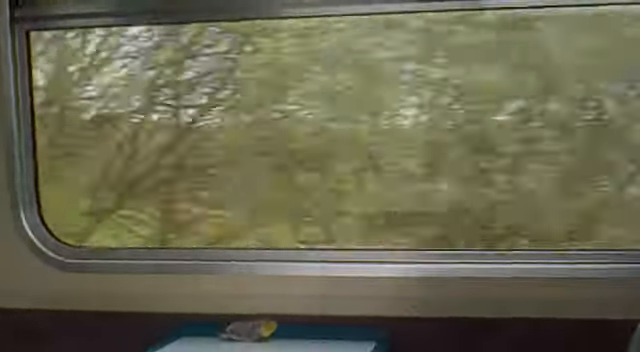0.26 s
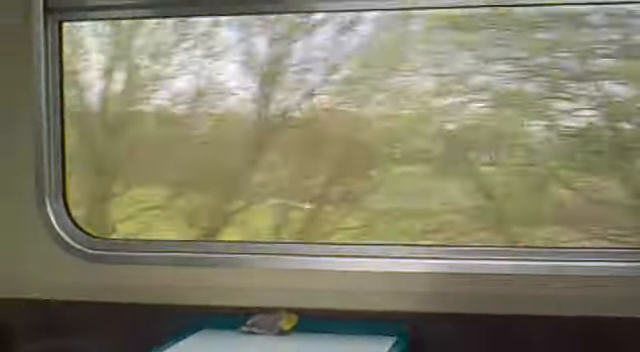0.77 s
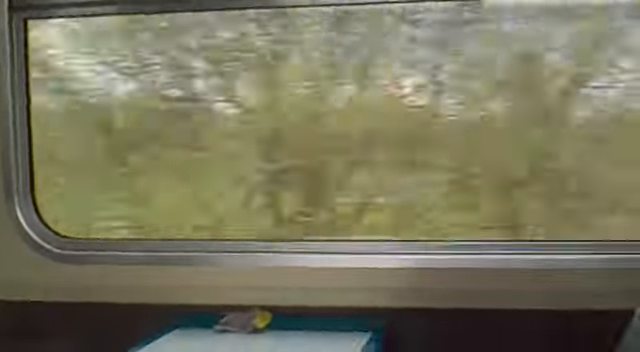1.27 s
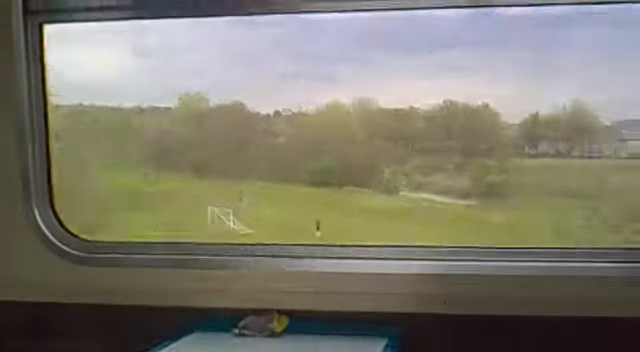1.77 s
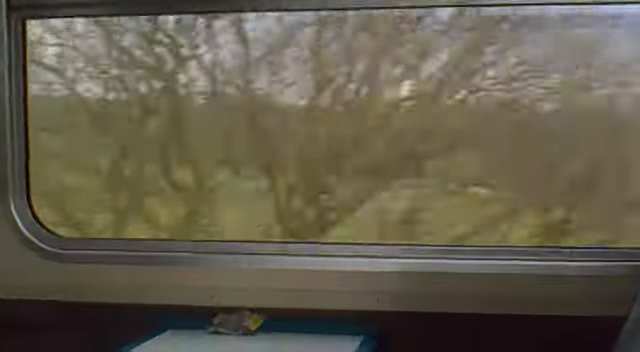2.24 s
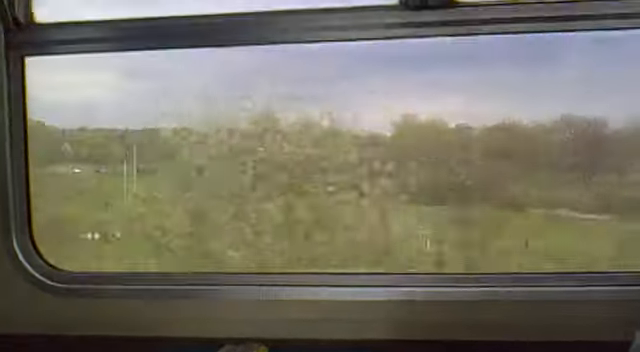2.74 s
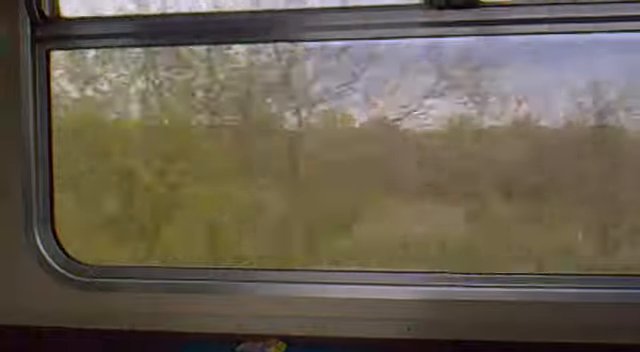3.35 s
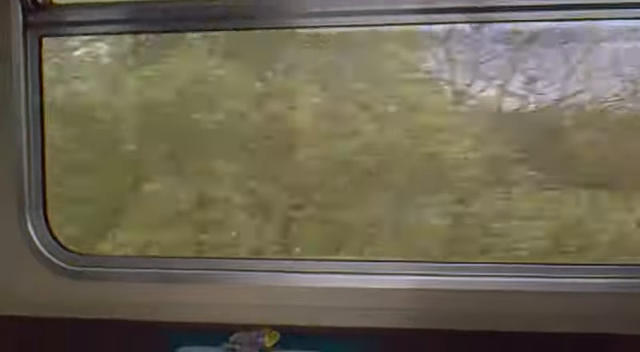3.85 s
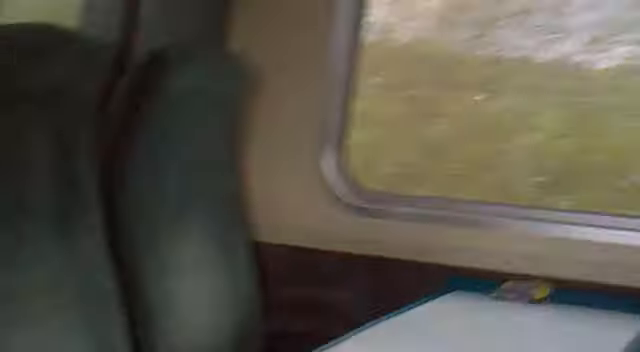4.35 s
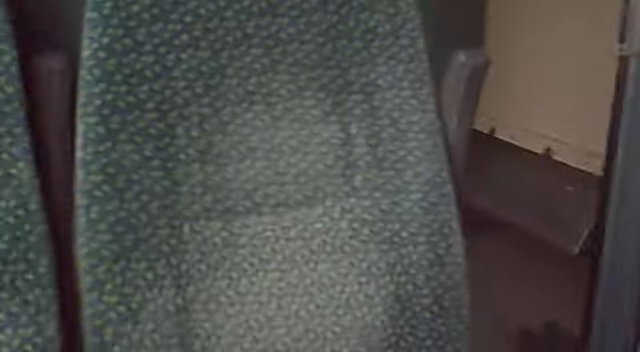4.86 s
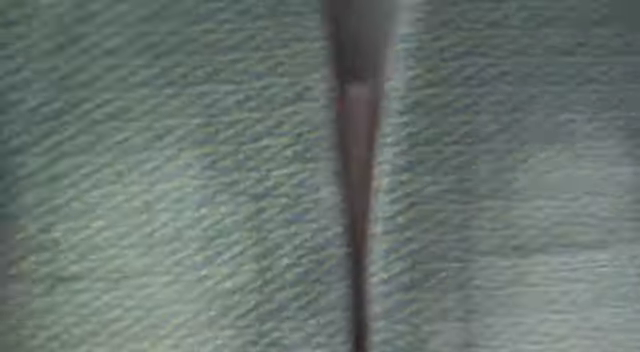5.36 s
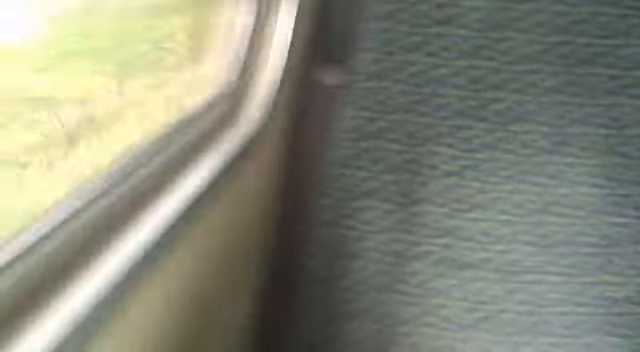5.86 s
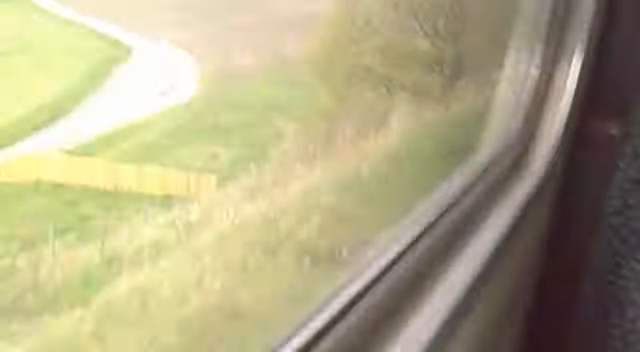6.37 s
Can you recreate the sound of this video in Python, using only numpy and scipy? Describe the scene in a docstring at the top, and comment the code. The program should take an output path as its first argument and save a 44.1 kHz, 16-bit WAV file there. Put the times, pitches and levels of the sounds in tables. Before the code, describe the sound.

Clusters of dull metallic wheel knocks recur under a rumbling, droning train carriage, and a hard loud click snaps nearby past the middle.

```python
"""Diesel train on jointed track

Inside a carriage, about every 0.85 s a group of axles crosses a rail joint. Each wheel blow is built from
ringing floor, frame and wheel, noise bursts for clatter and loose fittings, and a slow low shudder.
Steady shaped noise makes the body rumble, the drive drone and the wheels roar and hiss on the rail.
A few dry clicks close by are pairs of tiny contacts heard through a small ringing part."""
import sys
import numpy as np
from scipy import signal
from scipy.fft import rfft, irfft, next_fast_len
from scipy.io import wavfile
from scipy.ndimage import map_coordinates

SR = 44100
rng = np.random.default_rng(int(sys.argv[2]) if len(sys.argv) > 2 else 0)


def put_to_file(sound):
    """Save the sound as 16-bit audio at rate SR, in the file named by the first command-line argument."""
    columns = np.atleast_2d(sound).T  # one column per channel
    safe = np.clip(columns, -1, 1)
    whole_steps = np.round(safe * 32767)
    wavfile.write(sys.argv[1], SR, whole_steps.astype(np.int16))


N = 291942

# Spectra give only the balance between pitches; noise() then evens out the loudness.
# low rumble and shudder of the carriage body: f/Hz, relative level/dB
RUMBLE_SPECTRUM = [(8, -5), (20, -3.5), (32, 3), (45, -7), (62, -6.5), (90, -18), (130, -15.5),
                   (250, -32.5), (600, -66.5)]
# roar of wheels rolling on rail: f/Hz, relative level/dB
ROAR_SPECTRUM = [(60, -14), (110, 7.5), (180, 6), (260, 3.5), (550, 1), (800, 3), (1250, -6), (1450, -11),
                 (2200, -16), (4000, -53)]
# hiss of wheels on rail: f/Hz, relative level/dB
HISS_SPECTRUM = [(900, -6), (1600, 7), (2300, 4), (3100, -2.5), (4300, -10), (6300, -15.5), (8300, -27),
                 (12000, -31), (14500, -36), (16000, -30)]
# resonances of the drive in the cabin, before drive_drone() sharpens them: f/Hz, width/Hz, level/dB
DRONE_MODES = [(142, 15, -7), (376, 25.6, 2), (406.7, 31, -1.5), (426.4, 21, -3.5)]
# state of the rail: t/s, roar level/dB, hiss level/dB
RAIL_STATE = [(0.0, -48, -50), (0.35, -49, -56.5), (1.2, -51.5, -56.5), (2.9, -50.5, -55), (3.75, -45, -50),
              (4.55, -47.5, -56), (5.4, -47, -58), (6.6, -41.5, -54)]
# effort of the drive: t/s, drone level/dB
DRIVE_EFFORT = [(0.1, -46.5), (0.37, -58), (0.55, -37), (1.25, -52.5), (2.2, -47), (2.75, -43.5),
                (4.1, -42), (5.5, -47), (6.6, -43)]
# wheels on joints, mostly three axles to a joint:
# t/s, strength/dB, weight on the floor/dB, frame thud relative to strength/dB, rise/s
BLOWS = [ (0.001, -42.5, 2.5, -1, 0.0012), (0.5348, -32, -2.5, -9, 0.00052),
         (0.639, -30.5, 2.5, -1, 0.0063), (0.7587, -24, 8, 0, 0.0021), (1.388, -35, 0.5, -11, 0.0044),
         (1.499, -35.5, 5, -3, 0.0045), (1.617, -29, 11.5, -8, 0.00079), (1.785, -45.5, -7.5, -7.5, 0.0034),
         (1.915, -49.5, 2, -12, 0.0036), (2.247, -39, 1.5, -4, 0.0086), (2.334, -28.5, -1, -7, 0.0013),
         (2.4506, -22.5, 5.5, -9.5, 0.0013), (3.087, -34.5, -7, -7, 0.0021), (3.212, -37, 0.5, -10, 0.0027),
         (3.344, -47.5, 8.5, -5, 0.007), (3.474, -45, -1, -10, 0.0056), (4.068, -30, 2, -1.5, 0.0041),
         (4.193, -27, 6.5, 1.5, 0.0017), (4.829, -33, -4.5, -9, 0.0035), (4.94, -29.5, 0, -0.5, 0.0062),
         (5.06, -25, 2.5, -2, 0.0043), (5.711, -39.5, 2, 1.5, 0.0044), (5.824, -43.5, 4.5, 3.5, 0.013),
         (5.9445, -36.5, 5, 2, 0.00033), (6.326, -56, 9.5, 11, 0.00067), (6.428, -58.5, 11, 20.5, .006)]
# floor panels and underframe: f/Hz, width/Hz, level/dB
FLOOR_MODES = [(218, 18, -15.5), (262.7, 17, 1), (302, 72, -7), (363, 13, -4), (397, 27, -12.5),
               (459.4, 6.6, 1), (703, 62, -2)]
# frame: f/Hz, width/Hz, level/dB
FRAME_MODES = [(148.5, 7.9, 0), (187.3, 5.6, -5)]
# wheel and bogie steel, as peaks on the clatter: f/Hz, width/Hz, lift/dB
STEEL_PEAKS = [(678, 65, 4.5), (738, 14, 5.5), (1280, 35, 1.5), (1876, 74, -4), (2040, 41, 1.5),
               (2320, 24, 2), (2400, 83, -4), (2840, 40, 5.5)]
# clatter through the steel body: f/Hz, relative level/dB
CLATTER_SPECTRUM = [(150, -40), (400, 8.5), (650, 3), (1000, 1.5), (1600, 2), (2500, 1.5), (3200, -12.5),
                    (4500, -20), (8000, -56)]
# sizzle of fittings: f/Hz, relative level/dB
SIZZLE_SPECTRUM = [(1800, -31), (3200, 2), (4000, -1.5), (5500, -4.5), (6700, -10), (7500, -17),
                   (8500, -20), (10500, -23.5), (12000, -28), (15500, -44)]
# diffuse boom of the floor panels: f/Hz, relative level/dB
BOOM_SPECTRUM = [(90, -25), (180, -3.5), (250, -5.5), (400, -3), (550, -10), (900, -0.5), (2000, -76)]
# ring of a struck wheel: f/Hz, relative level/dB, time to fall by 60 dB/s
CLANG_PARTIALS = [(2205, -2, 0.47), (2260, 3.5, 0.21), (2400, 0, 0.24), (2850, -6, 0.22)]
# small hard clicks nearby: t/s, peak level/dB, treble tilt above 2 kHz/(dB per octave)
CLICKS = [(3.887, -32, -6), (3.909, -23.5, -2), (4.081, -4, -3), (4.1507, -14, -0.5), (4.356, -19.5, -10),
          (4.762, -40.5, -2)]
# what the clicking part rings with: f/Hz, width/Hz, level/dB
TICK_MODES = [(2430, 1000, 7.5), (3730, 2100, 1), (6960, 870, -17.5), (14200, 3500, -7)]

# upper edge of the sound
TOP_HZ = 15850
# steady rumble, how far it sways, and how far the rail noises wander
RUMBLE_DB, SWAY_DB, PATCHY_DB = -42.5, 3, 1.5
# an ordinary blow: strength, rise and ring time (a fall of 60 dB)
USUAL_DB, USUAL_RISE_S, RING_T60_S = -31.5, 0.0017, 0.35
# abrupt blows die sooner and ring the wheel more; so many dB of extra strength halve the ring time
RING_PER_RISE, CLANG_DB_PER_HALVING, RING_HALVING_DB = 0.26, 0.5, 15.5
# treble limit of the knock, and the dB of weight that lower it an octave
CONTACT_HZ, CONTACT_HALVING_DB = 793, 10
# springs even out the blows: shudder of an ordinary one, and dB more per dB of strength or weight
SHUDDER_DB, SHUDDER_PER_DB = -30.5, 0.36
# what a blow excites, relative to its strength, before weight and abruptness change it
CLATTER_DB, KNOCK_DB, SIZZLE_DB, CLANG_DB = -0.24, -1.6, -13.5, -11.5
# a light wheel rings more freely: dB of clang lost per dB of weight
CLANG_DAMPING = 0.38
# diffuse boom against the clean ring of the panels
BOOM_DB = -0.5
# the wheel lands again after its hop: usual delay and its random scatter
REBOUND_S, REBOUND_SCATTER_S = 0.0185, 0.0012


def amp(db):
    """Turn decibels into a gain."""
    return 10 ** (np.asarray(db) / 20)


def unit(x):
    """Scale x to an average (rms) level of 1."""
    return x / np.sqrt(np.mean(x ** 2) + 1e-20)


def onset_unit(x):
    """Scale x so that its first 40 ms spread (standard deviation) by 1."""
    return x / np.std(x[:SR // 25])


def along(points, hz):
    """Read a (frequency, value) table between its points, on a log frequency axis."""
    f, v = np.transpose(points)
    return np.interp(np.log(hz + 1), np.log(f + 1), v)


def curves(rows):
    """Draw one value per sample for each column after the time."""
    s, *columns = np.transpose(rows)
    return [np.interp(np.arange(N) / SR, s, column) for column in columns]


def wobble(rate):
    """Make a smooth random curve through `rate` random points a second."""
    knots = rng.standard_normal(int(N * rate / SR) + 4)
    return map_coordinates(knots, [np.arange(N) * rate / SR])


def filtered(x, response):
    """Pass x through a response given as a function of frequency."""
    m = next_fast_len(len(x) + SR // 2)  # room for the ringing after the end
    spectrum = rfft(x, m) * response(np.fft.rfftfreq(m, 1 / SR))
    return irfft(spectrum, m)[:len(x)]


def lowpassed(x, hz):
    """Gently take away what lies above hz."""
    return signal.sosfilt(signal.butter(2, min(hz, SR / 4), fs=SR, output="sos"), x)


def resonances(modes, f):
    """Add up the responses of damped parts that ring only after they are pushed."""
    return sum(amp(db) * 1j * f * width / (center * center - f * f + 1j * f * width)
               for center, width, db in modes)


def noise(spectrum, size, peaks=()):
    """Make noise of rms 1 with a broad spectrum and narrow peaks on top."""
    def response(f):
        lift_db = sum(db / (1 + (2 * (f - center) / width) ** 2) for center, width, db in peaks)
        return amp(along(spectrum, f) + lift_db)
    return unit(filtered(rng.standard_normal(size), response))


def add(track, s, sound):
    """Mix a sound into the track at time s."""
    start = max(round(s * SR), 0)
    track[start:start + len(sound)] += sound[:N - start]


def body_rumble():
    """The carriage body rumbles: low noise whose level slowly sways."""
    return amp(RUMBLE_DB + SWAY_DB * wobble(7)) * noise(RUMBLE_SPECTRUM, N)


def drive_drone():
    """The drive drones: noise through cabin resonances, louder and softer with its effort."""
    drone_db, = curves(DRIVE_EFFORT)
    # a power above 1 makes the resonances stand out more
    response = lambda f: np.abs(resonances(DRONE_MODES, f)) ** 1.56
    return amp(drone_db) * unit(filtered(rng.standard_normal(N), response))


def rail_noise():
    """Wheels roar and hiss on the rail: two noises rise and fall together over rough and smooth patches."""
    roar_db, hiss_db = curves(RAIL_STATE)
    patches_db = PATCHY_DB * wobble(12)
    roar = amp(roar_db + patches_db) * noise(ROAR_SPECTRUM, N, [(824, 53, 4.1), (1260, 134, 6.9)])
    hiss = amp(hiss_db + patches_db) * noise(HISS_SPECTRUM, N)
    return roar + hiss


def blow(t, rise, hold, t60, tail_db, tail_t60):
    """Vibration spreads, lasts while the wheel chatters, dies fast, and lingers faintly in the carriage."""
    late = np.maximum(t - hold, 0)
    growth = 1 - np.exp(-t / max(rise, 1e-4))
    return growth * np.hypot(amp(-60 * late / t60), amp(tail_db - 60 * late / tail_t60))


def struck(modes, t, rebound, delay):
    """The wheel drops on the rail end and rebounds; the modes ring from both short pushes."""
    push = lambda s: np.exp(-((t - s) / 0.00019) ** 2)
    force = push(0.0019) + rebound * push(0.0021 + delay)
    return filtered(force, lambda f: resonances(modes, f))


def floor_knock(t, rise, t60, weight_db, hop):
    """The floor panels ring cleanly from the two pushes and also boom diffusely through the carriage."""
    boom = noise(BOOM_SPECTRUM, SR, [(266, 33, 7.6), (373, 76, 7.1)])
    boom = boom * blow(t, rise * 2, 0.015, t60 * 1.09, -16, 0.99)
    ring = struck(FLOOR_MODES, t, rebound=1.0, delay=hop)
    knock = onset_unit(ring) + amp(BOOM_DB) * onset_unit(boom)
    # a heavy wheel stays longer in contact and weakens the upper panel modes
    return lowpassed(knock, CONTACT_HZ * 2 ** (-weight_db / CONTACT_HALVING_DB))


def wheel_clang(t, rise, scatter_db):
    """A struck wheel rings in fading pure tones, each struck a little differently every time."""
    tones = sum(np.sin(2 * np.pi * hz * t) * amp(db + scatter_db * rng.normal() - 60 * t / t60)
                for hz, db, t60 in CLANG_PARTIALS)
    return tones * (1 - np.exp(-t / rise))


def joints():
    """Each axle at a joint knocks the floor, thuds the frame, clangs, clatters, sizzles and shudders."""
    out, t = np.zeros(N), np.arange(SR) / SR
    for s, strength_db, weight_db, thud_db, rise in BLOWS:
        excess_db = strength_db - USUAL_DB
        softness = np.log2(max(rise, 1e-4) / USUAL_RISE_S)  # octaves slower than usual
        t60 = RING_T60_S * 2 ** (RING_PER_RISE * softness - excess_db / RING_HALVING_DB)
        hop = REBOUND_S + REBOUND_SCATTER_S * rng.normal()

        # loose parts chatter in small uneven bursts
        chatter = amp(1.8 * wobble(260)[:SR])
        clatter = noise(CLATTER_SPECTRUM, SR, STEEL_PEAKS) * chatter
        clatter = clatter * blow(t, rise, 0.02, t60, -10.0, 0.81)
        sizzle = noise(SIZZLE_SPECTRUM, SR) * chatter
        sizzle = sizzle * blow(t, rise * 1.7, 0.024, t60 * 1.08, -9, 0.75)
        clang = wheel_clang(t, rise, scatter_db=4.5)
        clang_db = CLANG_DB - CLANG_DB_PER_HALVING * softness - CLANG_DAMPING * weight_db
        knock = floor_knock(t, rise, t60, weight_db, hop)
        thud = struck(FRAME_MODES, t, rebound=0.42, delay=hop)

        parts = [(CLATTER_DB, clatter), (SIZZLE_DB, sizzle), (clang_db, clang),
                 (KNOCK_DB + weight_db, knock), (thud_db, thud)]
        add(out, s, sum(amp(strength_db + db) * onset_unit(part) for db, part in parts))

        shudder = noise(RUMBLE_SPECTRUM, SR) * blow(t, 0.0088, 0.036, 0.84, -5.0, 0.95)
        shudder_db = SHUDDER_DB + SHUDDER_PER_DB * (excess_db + weight_db)
        add(out, s, amp(shudder_db) * shudder)
    return out


def clicks():
    """A small hard part ticks: one contact and a quick bounce, heard through its damped modes."""
    out, t = np.zeros(N), np.arange(SR // 20) / SR
    for s, peak_db, tilt_db in CLICKS:
        # a contact is a very short pulse with nothing above TOP_HZ
        contact = lambda delay: np.sinc((t - delay) * 2 * TOP_HZ)
        force = contact(0.00054) + 1.3 * contact(rng.uniform(0.000914, 0.00142))
        tilt = lambda f: amp(tilt_db * np.log2(np.maximum(f, 2000) / 2000))
        tick = filtered(force, lambda f: resonances(TICK_MODES, f) * tilt(f))
        add(out, s, amp(peak_db) * tick / np.max(np.abs(tick)))
    return out


def scene():
    """Add steady travel, rail joints and clicks into one channel."""
    running = body_rumble() + drive_drone() + rail_noise()
    return (running + joints() + clicks())[None]


def record(dry):
    """Fade out the highest treble over 400 Hz around TOP_HZ."""
    response = lambda hz: np.clip((TOP_HZ - hz) / 400 + .5, 0, 1)
    return np.array([filtered(channel, response) for channel in dry])


dry = scene()
out = record(dry)
put_to_file(out)
```